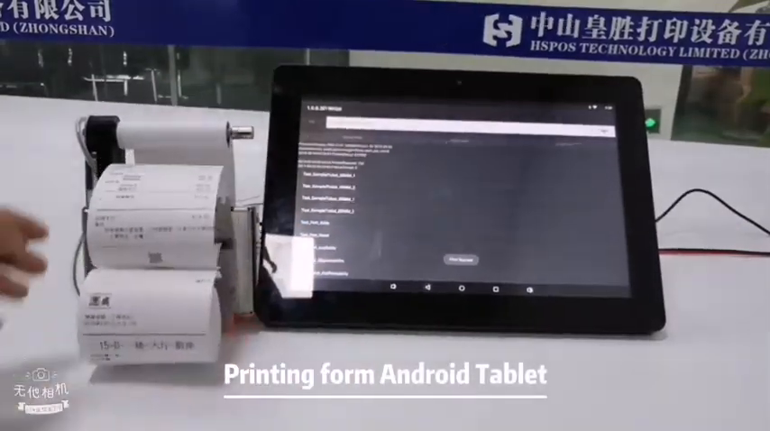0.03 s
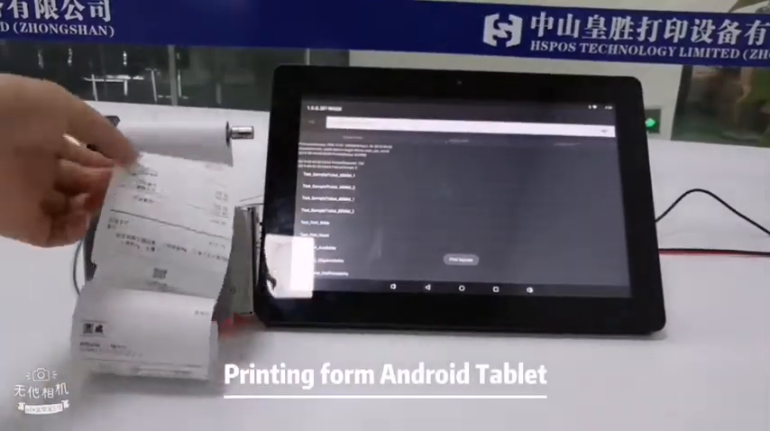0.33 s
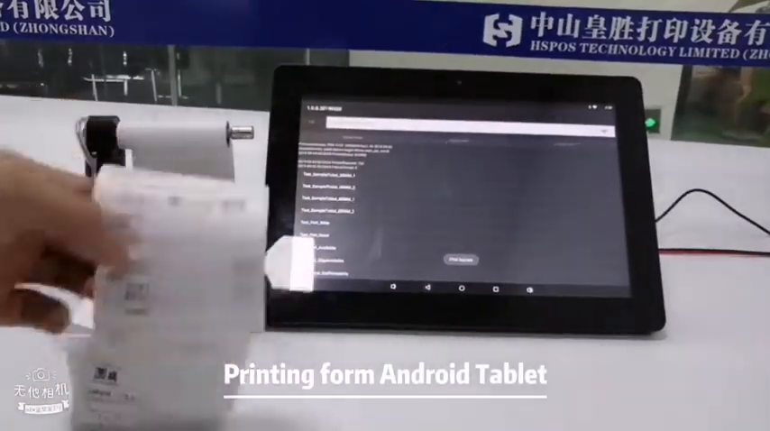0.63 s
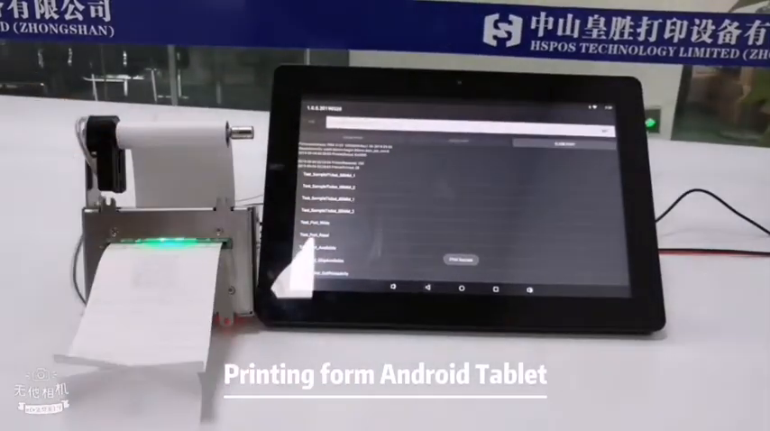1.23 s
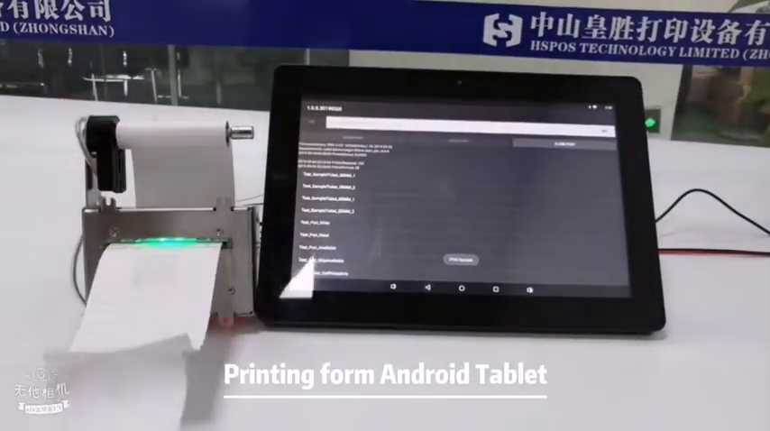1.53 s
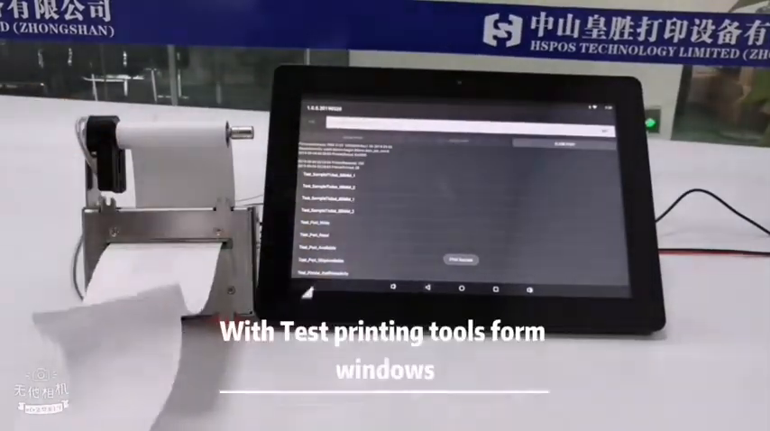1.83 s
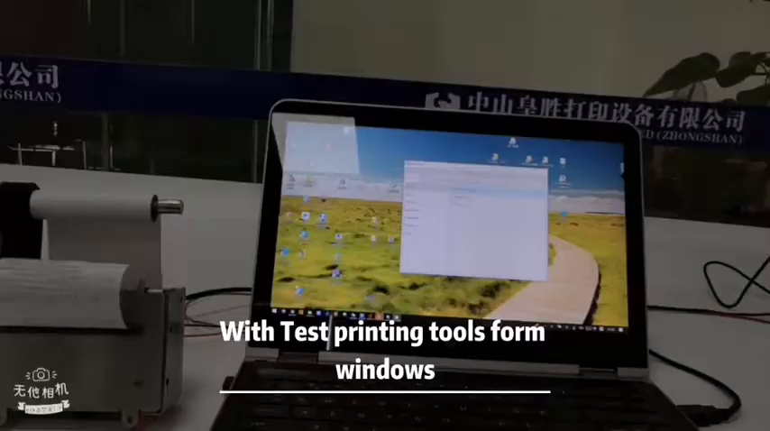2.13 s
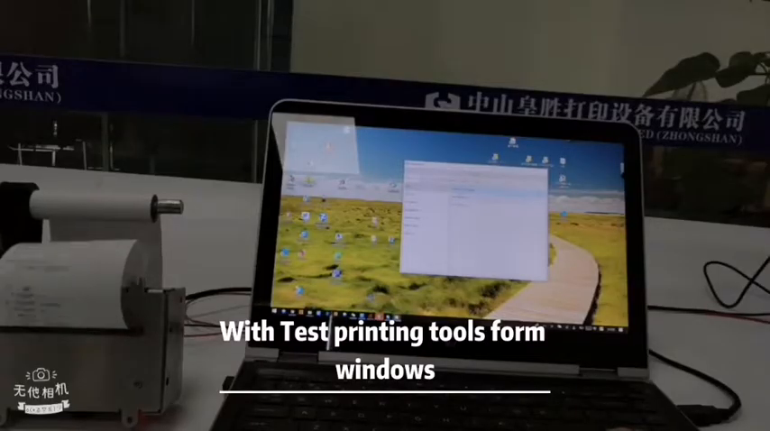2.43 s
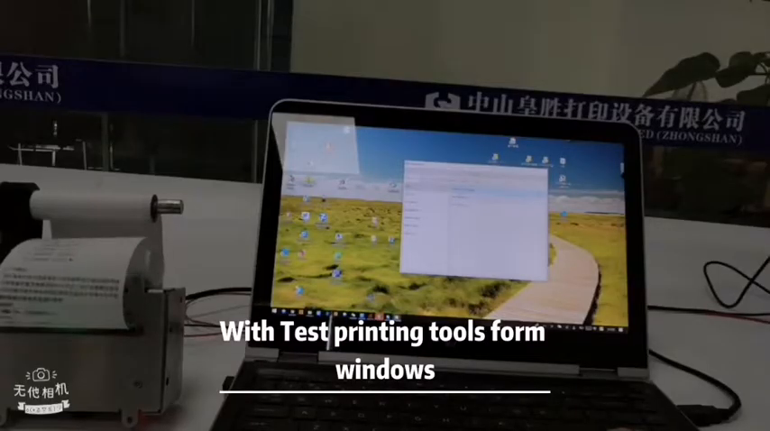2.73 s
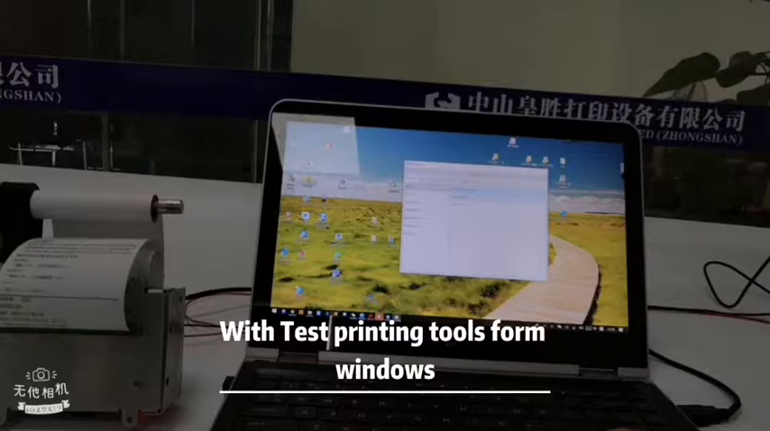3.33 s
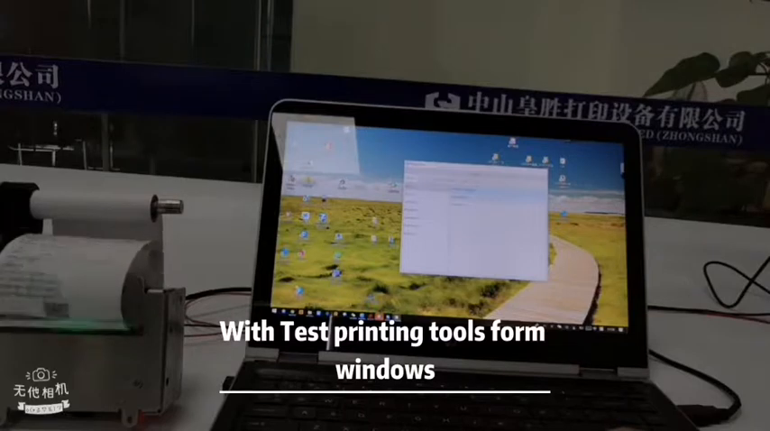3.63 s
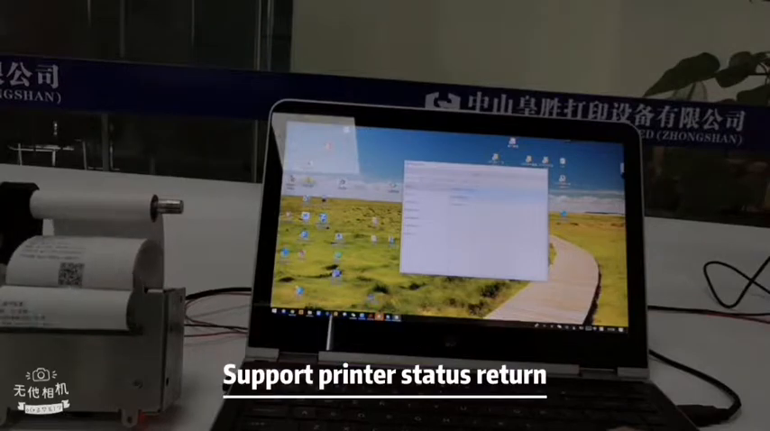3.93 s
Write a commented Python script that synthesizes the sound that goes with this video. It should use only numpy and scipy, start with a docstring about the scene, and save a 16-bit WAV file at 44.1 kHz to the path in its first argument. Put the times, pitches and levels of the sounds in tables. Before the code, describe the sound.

Receipt printer feeding paper in whining bursts, its cutter whirring and clicking in a quiet office.

```python
"""Short bursts of whining, whirring and clicking: thermal receipt printers on a desk in a quiet office.
A stepper motor (one that turns in tiny steps) speeds up, whines through its gears and drags paper past
the print head, slower over dense print. Between jobs a small cutter whirs, shears the paper and clicks
home. A loose receipt rustles faintly."""
import sys
import numpy as np
from scipy import signal
from scipy.fft import rfft, irfft, next_fast_len
from scipy.io import wavfile
from scipy.ndimage import map_coordinates

SR = 44100
rng = np.random.default_rng(int(sys.argv[2]) if len(sys.argv) > 2 else 0)


def file_out(sig):
    """Save sig as 16-bit WAV at sys.argv[1]."""
    # one column per channel
    cols = np.atleast_2d(sig).T
    # limit, then scale
    lim = np.clip(cols, -1, 1)
    pcm = np.round(lim * 32767).astype(np.int16)
    wavfile.write(sys.argv[1], SR, pcm)


N = 176400
T = np.arange(N) / SR


def amp(db):
    """Turn decibels into a number to multiply by."""
    return 10 ** (np.asarray(db) / 20)


def unit(x):
    """Scale a signal to an average strength (rms) of 1."""
    return x / np.sqrt(np.mean(x ** 2) + 1e-20)


def along(points, hz):
    """Read between (frequency [Hz], value) points, giving each octave equal room."""
    freqs, values = np.transpose(points)
    return np.interp(np.log(hz + 1), np.log(freqs + 1), values)


def wobble(rate):
    """A smooth random curve through `rate` random values a second."""
    return map_coordinates(rng.standard_normal(int(N * rate / SR) + 4), [T * rate])


def filtered(x, response):
    """Turn each frequency up or down by response(hz)."""
    size = next_fast_len(N + 8192)
    return irfft(rfft(x, size) * response(np.fft.rfftfreq(size, 1 / SR)), size)[:N]


def noise(spectrum, grain=1):
    """Noise of strength 1, roughened by `grain`, then shaped by (frequency [Hz], level [dB]) rows."""
    return unit(filtered(grain * rng.standard_normal(N), lambda hz: amp(along(spectrum, hz))))


def gate(start, stop, fade_s=0.0076):
    """Switch on between two times, with a quick fade in and out."""
    return np.clip((T - start) / fade_s, 0, 1) * np.clip((stop - T) / fade_s + 1, 0, 1)


def bursts(rows):
    """Short bell-shaped swells from (time [s], level [dB], length [s]) rows."""
    return sum(amp(db) * np.exp(-np.minimum((2 * (T - s) / length) ** 2, 50)) for s, db, length in rows)


def tones(rows, phase):
    """Fluttering tones from (multiple of the base pitch, level [dB]) rows."""
    return sum(amp(db + 2.5 * wobble(70)) * np.sin(k * phase + rng.uniform(0, 2 * np.pi))
               for k, db in rows)


def room_tone():
    """The office's soft background noise, joined partway through by a low rumble."""
    # tone colour of the background and of the rumble (frequency [Hz], level [dB])
    air_spectrum = [(12, -32), (22, -7), (45, -1.5), (70, -9), (95, -10), (125, -15.5), (165, -13),
                    (225, -8.5), (306, -14.5), (534, -17.5), (1380, -30), (3540, -38.5), (5530, -39.5),
                    (8500, -29.5), (11000, -46), (15500, -43)]
    rumble_spectrum = [(20, -19), (55, -4), (95, -2.5), (125, -32), (300, -27)]
    # loudness of the background (time [s], level [dB])
    air_levels = [(0, -55), (1.3, -56), (1.7, -56.5), (2.0, -65), (2.3, -57), (4, -57.5)]
    air = amp(np.interp(T, *np.transpose(air_levels)) + wobble(8)) * noise(air_spectrum)
    rumble = amp(-59) * gate(start=2.1, stop=N / SR) * noise(rumble_spectrum)
    return air + rumble


def office_echo(sound):
    """The room answers with a soft, ever-changing echo; each frequency dies away at its own speed."""
    # how long the room rings (frequency [Hz], time to fade by 60 dB [s])
    ring_times = [(200, 0.47), (1200, 1), (4000, 0.82), (8500, 0.75), (15000, 0.13)]
    # strength of the echo (frequency [Hz], level [dB])
    echo_levels = [(200, -11), (700, -12), (1100, -14.5), (1280, -14.5), (2200, -10), (8000, -9),
                   (15000, -7.5)]
    sound = filtered(sound, lambda hz: amp(along(echo_levels, hz)))
    out = np.zeros(N + 3 * SR)
    hop, delay = SR // 5, SR // 150  # in samples
    for centre in range(0, N + hop, hop):  # each overlapping piece gets its own tail of fading noise
        hz, t, spectra = signal.stft(rng.standard_normal(SR), SR, nperseg=256)
        fade = amp(-60 * t / along(ring_times, hz)[:, None])
        tail = signal.istft(spectra * fade, SR, nperseg=256)[1]
        span = np.arange(max(centre - hop, 0), min(centre + hop, N))
        piece = sound[span] * np.cos(np.pi / 2 * (span - centre) / hop)
        echo = signal.fftconvolve(piece, tail / np.linalg.norm(tail))
        out[span[0] + delay:][:len(echo)] += echo
    return out[:N]


def loose_receipt():
    """A loose receipt crinkles in faint, grainy puffs of noise."""
    # each crinkle (time [s], level [dB], length [s])
    crinkles = [(1.615, -67.5, 0.049), (1.73, -72, .02), (1.785, -66, 0.038), (1.818, -59, .012),
                (1.858, -65, .008), (1.887, -59, 0.0091), (1.95, -61.5, 0.025), (1.975, -62.5, .012),
                (2.016, -60.5, 0.013)]
    # their tone colour (frequency [Hz], level [dB])
    spectrum = [(500, -24), (2200, -6), (3000, -12), (4300, -5.5), (7000, -4.5), (9000, 7), (11000, -8),
                (13000, -14), (15500, -12)]
    return bursts(crinkles) * noise(spectrum, grain=amp(4 * wobble(700)))


def clicks():
    """The cutter and other moving parts click: very short bursts of bright noise."""
    # each click (time [s], level [dB], length [s])
    hits = [(.16, -44, 0.0086), (.182, -41.5, 0.0053), (.416, -41.5, 0.006), (.498, -38.5, .004),
            (.534, -39, 0.0034), (.9115, -31.5, 0.0048), (.948, -42, 0.01), (1.067, -42.5, .008),
            (2.673, -39.5, 0.0068), (2.95, -34.5, 0.0062), (3.224, -38.5, .005), (3.2995, -33, .002),
            (3.3075, -55, .002), (3.335, -30.5, 0.0021), (3.4205, -30.5, .003), (3.444, -32, 0.0035),
            (3.558, -40, .008), (3.625, -36.5, 0.0041), (3.646, -44, 0.0073), (3.698, -40.5, .005),
            (3.9595, -39, .006)]
    # their tone colour (frequency [Hz], level [dB])
    spectrum = [(300, -12.5), (1200, -2.5), (1800, -14.5), (2500, -4), (3200, -4.5), (5800, 0), (7000, 1),
                (8300, 8.5), (10000, -1.5), (12000, -10.5), (15500, -11)]
    return bursts(hits) * noise(spectrum)


def case_knocks(attack_s=.0007):
    """The motor's first steps jolt the printer's case, which rings briefly."""
    # each jolt (time [s], level [dB])
    jolts = [(.164, -26.5), (.169, -26), (1.068, -33), (1.076, -35.5), (2.952, -37), (2.962, -39),
             (3.56, -37), (3.567, -44)]
    # the case's own notes (frequency [Hz], relative level [dB], time to fade by 60 dB [s])
    notes = [(220, -28, 0.023), (550, -3.5, 0.0099), (830, 2, 0.01), (1170, -7, 0.0076)]
    out = np.zeros(N)
    t = np.arange(SR // 10) / SR
    for start, db in jolts:
        ring = sum(amp(level + rng.normal(0, 3.6) - 60 * t / fade_s) * np.sin(2 * np.pi * hz * t)
                   for hz, level, fade_s in notes)
        out[round(start * SR):][:len(t)] += amp(db) * ring * (1 - np.exp(-t / attack_s))
    return out


def paper_shear():
    """Fibres snap as the paper is scraped and cut, making a gritty hiss."""
    # each scrape or cut (start [s], length [s], level [dB])
    scrapes = [(0.487, 0.038, -44.5), (0.773, 0.052, -43.5), (1.118, .03, -42.5), (3.286, .052, -35),
               (3.61, 0.04, -46.5)]
    # their tone colour (frequency [Hz], level [dB])
    spectrum = [(300, -12.5), (1300, -8), (3000, -8.5), (4800, -1.5), (6500, -0.5), (8300, 13.5),
                (10500, -5), (13000, -10), (15500, -10.5)]
    loudness = sum(amp(db) * gate(start, start + length) for start, length, db in scrapes)
    return loudness * noise(spectrum, grain=amp(2.4 * wobble(900)))


def blade_squeak(start=.777, stop=.819, from_hz=1230, to_hz=1400):
    """The blade sticks on the paper and gives one shaky, rising squeak."""
    pitch = np.interp(T, [start, stop], [from_hz, to_hz]) + 130 * wobble(400)
    return amp(-43.5) * gate(start, stop) * np.sin(2 * np.pi * np.cumsum(pitch) / SR)


def cutter():
    """Each stroke of the cutter is a gritty high whir with a thin, unsteady whistle."""
    # loudness of the cutter, one list per stroke (time [s], relative level [dB])
    strokes = [
        [(0.705, -48), (0.721, -39.5), (0.817, -41.5), (0.899, -44.5), (0.907, -39.5), (0.999, -44),
         (1.04, -59)],
        [(3.225, -46), (3.233, -49), (3.257, -39), (3.325, -42.5), (3.377, -42.5), (3.443, -40.5),
         (3.52, -53.5)],
        [(3.96, -54), (3.966, -48), (3.992, -39), (4.0, -44)],
    ]
    # tone colour of the whir (frequency [Hz], level [dB])
    spectrum = [(200, -40), (800, -15), (1250, -8), (1900, -14.5), (2400, -11.5), (3100, -19.5),
                (5500, -19.5), (7200, -13.5), (8100, 0), (8900, -4), (9600, -13.5), (12000, -24.5),
                (15500, -26)]
    trim_db, whistle_db_per_stroke = -3, [-20, -1, -4]
    whir = noise(spectrum, grain=amp(2 * wobble(600)))
    whistle_hz = 8900 + 110 * wobble(330)
    whistle = unit(np.sin(2 * np.pi * np.cumsum(whistle_hz) / SR))
    out = np.zeros(N)
    for stroke, whistle_db in zip(strokes, whistle_db_per_stroke):
        times, levels = np.transpose(stroke)
        loudness = gate(times[0], times[-1]) * amp(np.interp(T, times, levels) + trim_db)
        out += loudness * (whir + amp(whistle_db) * whistle)
    return out


def motor_whine(steady_phase, phase, unevenness):
    """The motor's steps make a tone; its load swells and drags once per turn of a gear."""
    # loudness of the step tone (time [s], level [dB])
    levels = [(0, -37.5), (.065, -41), (.18, -44), (.21, -47.5), (.27, -46.5), (.32, -37.5), (.39, -39.5),
              (.415, -48.5), (.45, -41), (.56, -40.5), (.66, -42.5), (.69, -46.5), (1.08, -46), (1.1, -42),
              (1.14, -41.5), (2.05, -51.5), (2.1, -42), (2.14, -47.5), (2.28, -41.5), (2.85, -40.5),
              (2.98, -55), (3.02, -40), (3.1, -47.5), (3.125, -42), (3.18, -39), (3.21, -48), (3.58, -44.5),
              (3.6, -42.5), (3.63, -51.5), (3.66, -44), (3.765, -50.5), (3.85, -42), (3.94, -46)]
    steps_per_turn, swell_db, drag_rad, flutter_db = 60, 2, 0.31, 1.5
    turn = steady_phase / steps_per_turn + .5 * wobble(10)
    swell = swell_db * (np.sin(turn) + .5 * np.cos(2 * turn))
    flutter = flutter_db * unit(wobble(45) + wobble(170))
    loudness = amp(np.interp(T, *np.transpose(levels)) + unevenness * (swell + flutter))
    return loudness * np.sin(phase + unevenness * drag_rad * np.cos(turn))


def paper_feed():
    """Whine, overtones, gear tones, paper rub and chirps all follow the motor's step rate."""
    # each run of the motor (start [s], stop [s], speed-up time [s], slow until [s; 0 = never slow],
    # overtone boost [dB], gear boost [dB], rub boost [dB])
    runs = [(-.2, .068, .05, 0, 0, 4, 0), (.162, .44, .035, .44, 1, 0, -1), (.44, .706, .001, 0, 0, 3, 0),
            (1.065, 1.144, .052, 0, 2, 1, 4), (2.047, 2.858, .001, 0, 0, 0, 0),
            (2.949, 3.215, .055, 3.105, -7, -2, -.5), (3.558, 3.945, .05, 0, -1, 0, .5)]
    # the motor's overtones at full speed (multiple of the step rate, level [dB])
    full_tones = [(2, -58.5), (3, -71.5), (4, -63.5), (5, -76.5), (6, -82), (7, -61), (8, -65), (9, -74)]
    # its overtones at slow speed (multiple of the step rate, level [dB])
    slow_tones = [(2, -51.5), (3, -52), (4, -58.5), (5, -82), (7, -59), (8, -61), (9, -58.5)]
    # pitches of the gear tones (multiple of the step rate)
    gear_pitches = [.65, 1.148, 1.3, 1.447, 1.668, 1.95, 2.1, 3.25]
    # loudness of each gear tone (level [dB])
    gear_levels = [-63.5, -70, -58.5, -63.5, -73, -61.5, -63, -70]
    # tone colour of rubbing paper and gears (frequency [Hz], level [dB])
    rub_spectrum = [(100, -28), (220, -9.5), (480, -12), (780, 3.5), (1000, 3.5), (1200, 0.5), (1400, -5.5),
                    (1900, -6.5), (2450, -2.5), (3000, -10.5), (3800, -8.5), (5200, -12), (7000, -9),
                    (8300, -0.5), (9000, -3), (10000, -12.5), (12000, -21.5), (14300, -28.5), (15300, -17)]
    # the paper chirps on the print head (time [s], level [dB], length [s])
    chirp_bursts = [(2.335, -55, .014), (2.383, -48, 0.017), (2.41, -55.5, 0.013), (2.44, -56, .016),
                    (2.675, -45, 0.009), (2.8, -52.5, 0.033)]
    chirp_tones = [(5, -3), (7, -0.5), (8, -10)]  # (multiple of the step rate, relative level [dB])
    full_hz, slow_hz = 1187.5, 920.9  # steps a second
    build_start_s, build_length_s, build_from_db = 2.04, 0.34, -3

    step_hz, slow, whine_gain, overtone_gain, gear_gain, rub_gain = np.zeros((6, N))
    for start, stop, speed_up_s, slow_until, overtone_db, gear_db, rub_db in runs:
        running, started = gate(start, stop), T >= start
        ramp = np.clip((T - start) / speed_up_s, 0, 1)
        limit_hz = np.where(T < slow_until, slow_hz, full_hz)
        step_hz[started] = np.minimum(full_hz * np.sqrt(ramp), limit_hz)[started]
        slow[started] = (T < slow_until)[started]
        whine_gain += running * np.maximum(ramp, .1)
        settled = running * ramp ** 3
        overtone_gain += settled * amp(overtone_db)
        gear_gain += settled * amp(gear_db)
        rub_gain += running * amp(rub_db)

    steady_phase = 2 * np.pi * np.cumsum(step_hz) / SR  # one cycle per step
    unevenness = 1 - 0.23 * slow  # smoother at slow speed
    phase = steady_phase + 0.15 * wobble(140) * unevenness  # steps come a little early or late
    whine = whine_gain * motor_whine(steady_phase, phase, unevenness)
    overtones = slow * tones(slow_tones, phase)
    overtones += (1 - slow) * tones(full_tones, phase + 0.072 * wobble(170))
    gears = tones(zip(gear_pitches, gear_levels), steady_phase + 0.48 * wobble(60))
    step_pulse = 1 + 0.32 * np.cos(phase)
    rub = amp(-48.5) * noise(rub_spectrum, grain=amp(2 * wobble(500)) * step_pulse)
    chirps = bursts(chirp_bursts) * tones(chirp_tones, steady_phase + 0.14 * wobble(260))
    drag = amp(1.1 * wobble(30))
    # in the longest run, the overtones, gears and rub start softly and swell
    build = amp(build_from_db * (T > build_start_s) * np.clip(1 - (T - build_start_s) / build_length_s, 0, 1))
    pitched = whine + chirps + build * (overtone_gain * overtones + gear_gain * gears)
    return np.sqrt(2) * pitched + build * drag * rub_gain * rub  # sqrt(2) gives a sine wave strength 1


def scene():
    """The printers, their echo and the office background, in one channel."""
    printers = paper_feed() + cutter() + paper_shear() + blade_squeak()
    printers += loose_receipt() + clicks() + case_knocks()
    background = room_tone()
    return (printers + office_echo(printers) + background)[None]


def record(dry):
    """Remove the very highest treble."""
    top_hz = 15600
    return filtered(dry[0], lambda hz: hz < top_hz)[None]


dry = scene()
out = record(dry)
file_out(out)
```